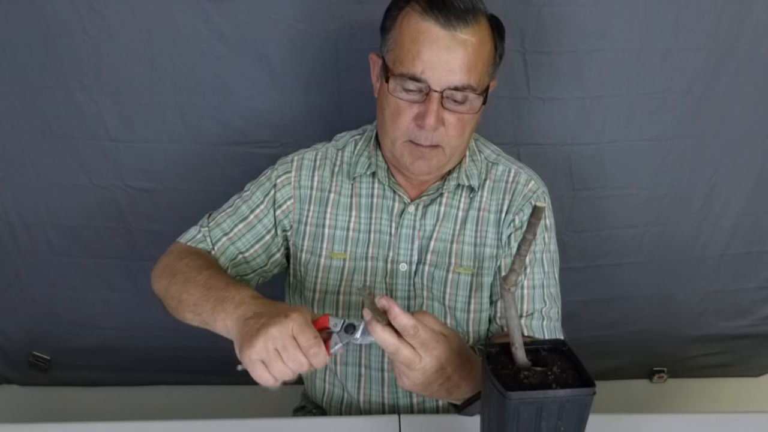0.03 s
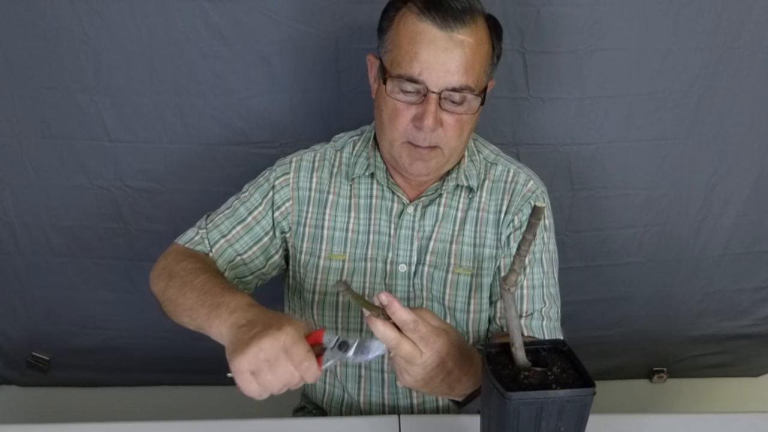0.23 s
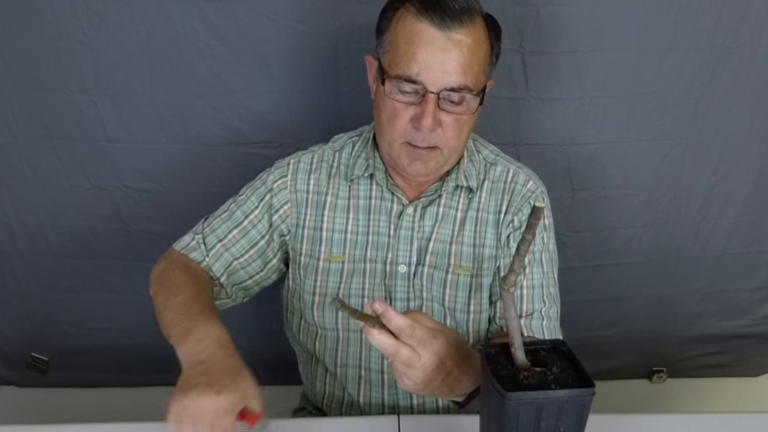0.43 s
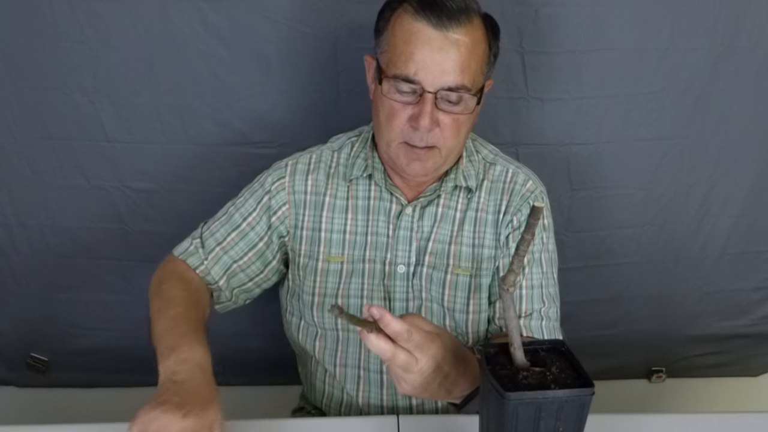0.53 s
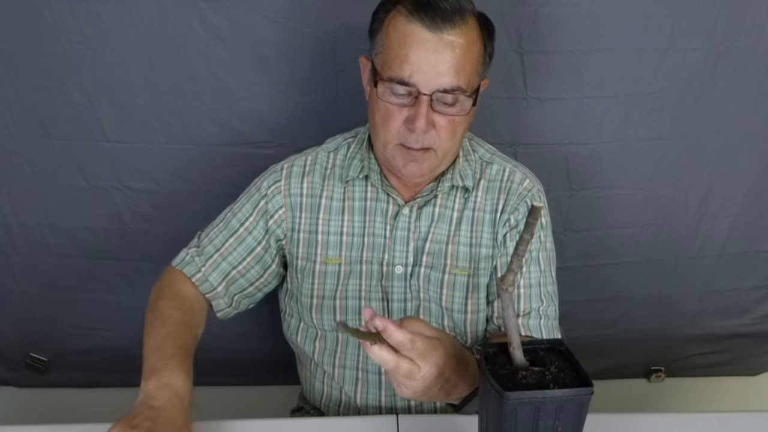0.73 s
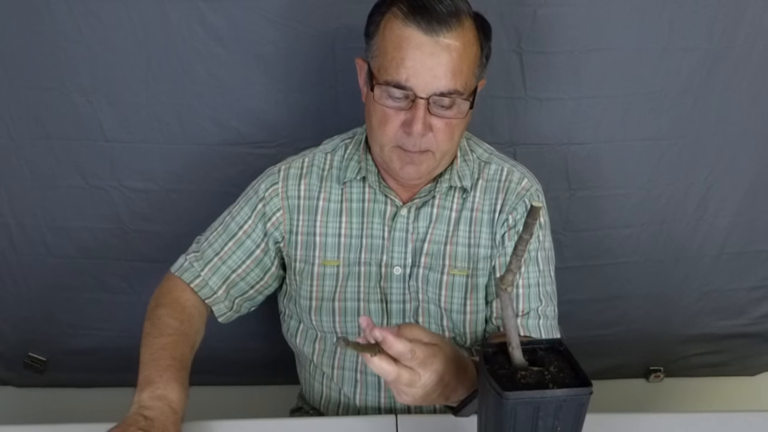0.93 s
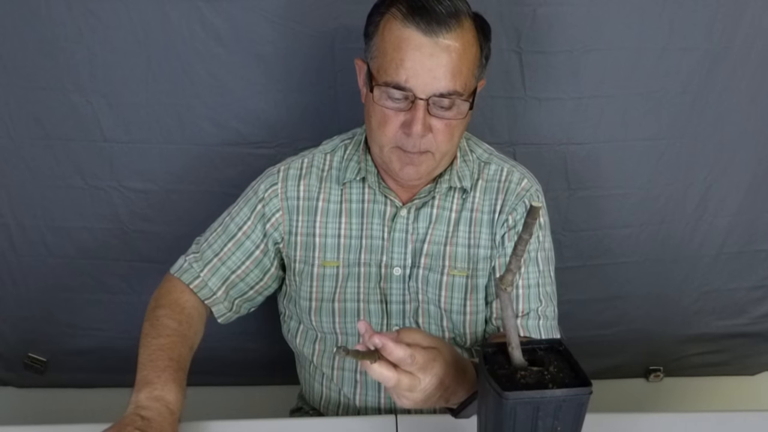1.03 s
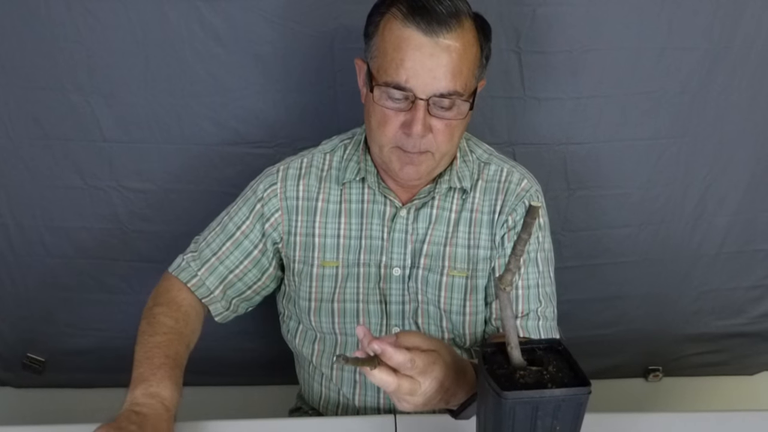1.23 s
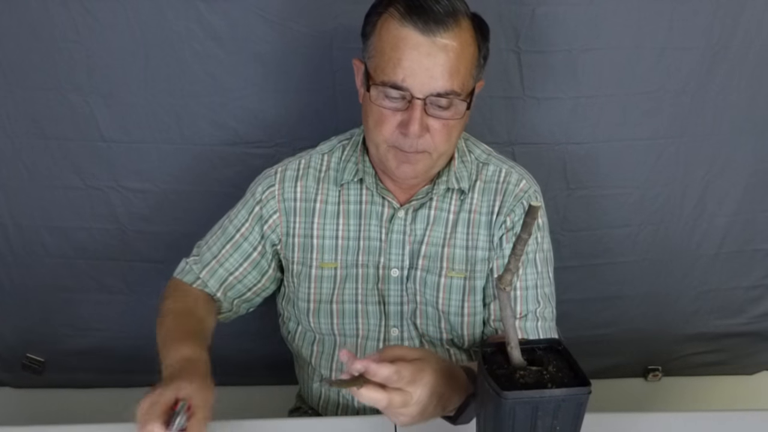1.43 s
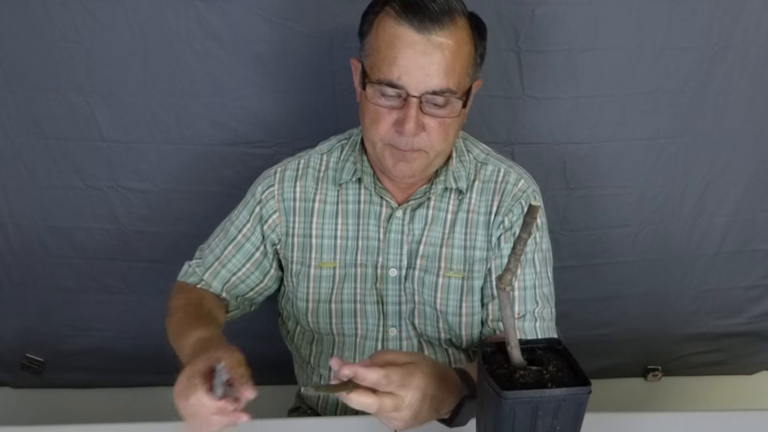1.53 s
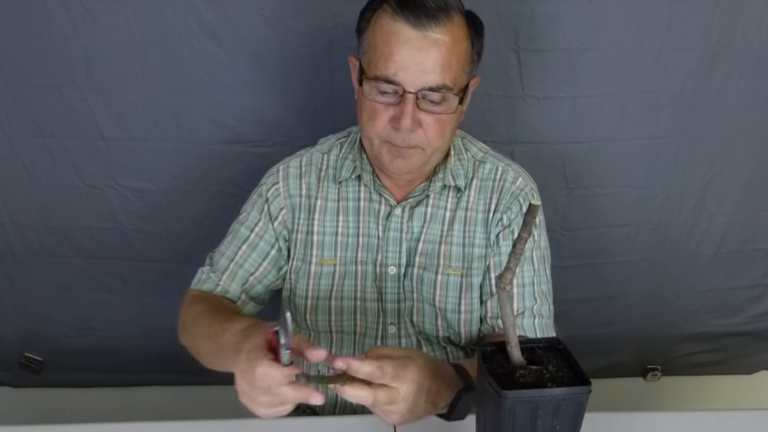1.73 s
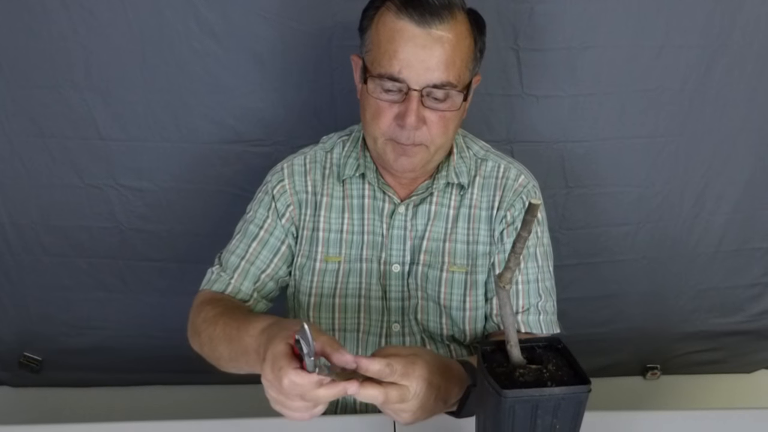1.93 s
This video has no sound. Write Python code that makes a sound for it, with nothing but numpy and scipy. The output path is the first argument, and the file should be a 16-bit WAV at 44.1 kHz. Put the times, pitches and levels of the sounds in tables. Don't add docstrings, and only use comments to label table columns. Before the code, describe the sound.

Hand pruning shears tick, crackle through a woody stem and snap shut with a brief steel ring, then are set down and dragged off a hollow plastic table, in a bare echoing room with faint ventilation hum.

```python
import sys
import numpy as np
from scipy import signal
from scipy.fft import rfft, irfft
from scipy.io import wavfile

SR = 44100
rng = np.random.default_rng(int(sys.argv[2]) if len(sys.argv) > 2 else 0)


def materialize(psi):
    bounded = np.clip(np.atleast_2d(psi).T, -1, 1)
    quanta = np.round(bounded * 32767).astype(np.int16)
    wavfile.write(sys.argv[1], SR, quanta)


def volts_from_decibels(level):
    exponent = np.asarray(level, float) / 20
    return 10 ** exponent


N = 88200
TIME_S = np.arange(N) / SR


def rms_one(x):
    return x / np.sqrt(np.mean(x ** 2) + 1e-20)


def at_hz(points, hz):
    table_hz, value = np.transpose(points)
    return np.interp(np.log(hz), np.log(table_hz), value)


def filtered(x, order, hz, kind):
    return signal.sosfilt(signal.butter(order, hz, kind, fs=SR, output="sos"), x)


def ring(x, modes, tilt_db_per_octave=0):
    out = 0
    for k, (hz, db, t60_s) in enumerate(modes):
        radius = volts_from_decibels(-60 / (t60_s * SR))
        angle = 2 * np.pi * hz / SR
        gain = volts_from_decibels(db + tilt_db_per_octave * np.log2(hz / 4000)) * (-1) ** k
        poles = [1, -2 * radius * np.cos(angle), radius * radius]
        out = out + gain * signal.lfilter([0, np.sin(angle)], poles, x + 1e-18)
    return out


def banded(likeness, gain_of_band):
    out = 0
    edges_hz = 24 * 2 ** (np.arange(29) / 3)
    white = rng.standard_normal((2, 2, N))
    for k, (low, high) in enumerate(zip(edges_hz, edges_hz[1:])):
        mid, side = filtered(white[k % 2], 2, [low, high], "band")
        hz = np.sqrt(low * high)
        alike = np.clip(at_hz(likeness, hz), 0, .999)
        stereo = np.sqrt(1 + alike) * mid + np.sqrt(1 - alike) * side * [[1], [-1]]
        out = out + gain_of_band(hz) * stereo
    return out


def grains(per_s, spread_db):
    size = volts_from_decibels(spread_db * np.minimum(rng.exponential(1, N), 4)) * rng.choice([-1, 1], N)
    return rms_one(size * (rng.random(N) < per_s / SR))


def swells(rows):
    out = 0
    for start_s, length_s, db in rows:
        u = np.clip((TIME_S - start_s) / length_s, 0, 9)
        out = out + volts_from_decibels(db) * np.sqrt(u) * np.exp(-u * u)
    return out


def contacts(rows, modes):
    crack_db = -13.5
    out = np.zeros(N)
    t = np.arange(int(.2 * SR)) / SR
    dead_modes = [(hz, db, .0015) for hz, db, _ in modes]
    for start_s, level_db, rise_s, tilt, crackle_s in rows:
        tones = 0
        for hz, db, t60_s in modes:
            decay = volts_from_decibels(db + tilt * np.log2(hz / 4000) - 60 * t / t60_s)
            tones = tones + decay * np.sin(2 * np.pi * (hz * t + rng.random()))
        burst = rng.standard_normal(len(t)) * np.exp(-t / crackle_s)
        crackle = ring(burst, dead_modes, tilt)
        swell = (1 - np.exp(-t / rise_s)) ** 2 * np.exp(rise_s * 900)
        i = int(start_s * SR)
        out[i:i + len(t)] += volts_from_decibels(level_db) * (tones + volts_from_decibels(crack_db) * crackle) * swell
    return out


# (frequency [Hz], level [dB per Hz])
HUM_SPECTRUM = [(15, -62), (25, -54), (114, -18.5), (149, -16), (309, -6.5), (695, -16.5), (887, -16),
                (11900, -31.5), (16000, -51.5)]
# (frequency [Hz], left-right likeness [0..1, below 0 counts as 0])
HUM_LIKENESS = [(60, -0.15), (240, 0.76), (950, -0.65), (3770, 0.16), (15000, 0.36)]


def ventilation():
    return volts_from_decibels(-56.5) * rms_one(banded(HUM_LIKENESS, lambda hz: volts_from_decibels(at_hz(HUM_SPECTRUM, hz))))


# (frequency [Hz], level [dB], t60 [s])
MOTOR_MODES = [(120.5, 2.5, 0.11), (197.6, -2.5, 0.51)]


def fan_motor():
    return volts_from_decibels(-67) * rms_one(ring(rng.standard_normal(N), MOTOR_MODES))


# (time [s], level [dB], rise [s], tilt [dB/octave], crackle [s])
BITE = [
    (.0790, -36.5, 0.000093, -0.26, 0.017),
]
# (frequency [Hz], level [dB], t60 [s])
BITE_MODES = [(1220, -6.5, 0.013), (1920, -3, 0.015), (4540, -1.5, 0.013), (6960, -7, 0.0052),
              (8900, -7.5, 0.0046), (11740, -4, 0.0017), (15300, -6, .003)]


def blade_bite():
    return contacts(BITE, BITE_MODES)


def shears_at_microphone(shears):
    pan_db, shadow_db, shadow_hz = 2.6, 4, 10000
    sos = signal.butter(2, shadow_hz, "high", fs=SR, output="sos")
    shade = volts_from_decibels(shadow_db) * signal.sosfiltfilt(sos, shears) * [[-1], [1]]
    return shears * volts_from_decibels([[pan_db], [-pan_db]]) + shade


# (frequency [Hz], t60 [s])
ROOM_T60 = [(150, 0.66), (500, 0.76), (1300, 0.63), (2300, 0.7), (3500, 0.68), (5200, 0.6469), (8000, 0.52),
            (13000, 0.1168)]
# (frequency [Hz], level [dB])
ROOM_LEVEL = [(150, -47.5), (500, -34), (1200, -40.5), (2400, -33.5), (3500, -35), (5200, -38), (8000, -35),
              (13000, -30)]
# (frequency [Hz], left-right likeness [0..1])
ROOM_LIKENESS = [(60, 0.38), (240, 1), (950, 0.65), (3770, 0.85), (15000, 0.49)]
# (delay [s], level [dB], pan [dB])
ECHOES = [
    (.0064, -3, -1.4),
    (.0035, -24.5, -24),
    (0.016, -4, 3.3),
]


def room(x):
    onset_s, smear_s = 0.018, 0.0015

    def decay(hz):
        return volts_from_decibels(at_hz(ROOM_LEVEL, hz) - 60 * TIME_S / at_hz(ROOM_T60, hz))

    response = banded(ROOM_LIKENESS, decay) * (1 - np.exp(-(TIME_S / onset_s) ** 2))
    for delay_s, db, pan_db in ECHOES:
        scatter = rng.standard_normal(N) * np.exp(-np.abs(TIME_S - delay_s) / smear_s * 2)
        gain = volts_from_decibels(db + np.array([[pan_db], [-pan_db]]) / 2)
        response += gain * scatter / np.sqrt(np.sum(scatter ** 2))
    return signal.fftconvolve(x[None], response, axes=1)[:, :N]


def fibre_crunch():
    start_s, end_s, end_db, rise_db = .218, .2475, -29, 19
    u = (TIME_S - start_s) / (end_s - start_s)
    swell = volts_from_decibels(end_db - rise_db * (1 - np.clip(u, 0, 1))) * (u > 0) * (u < 1)
    crackle = grains(3700, spread_db=-8.0) * swell
    return filtered(crackle, 2, [1500, 11500], "band") + volts_from_decibels(-30) * ring(crackle, BLADE_MODES)


# (time [s], level [dB], rise [s], tilt [dB/octave], crackle [s])
SNAPS = [
    (.2472, -16.5, 0.00043, 3, 0.0052),
    (.2488, -19, .0004, -4.5, 0.0019),
    (.2538, -4, 0.00057, 0.5, 0.0024),
]
# (frequency [Hz], level [dB], t60 [s])
BLADE_MODES = [(250, -39, 0.066), (400, -32, 0.017), (844, -32, 0.024), (2085, 1, 0.0057),
               (3330, -8, 0.0082), (3620, -18, 0.0039), (5105, 2, 0.0067), (6370, -13, 0.0037),
               (6880, -14, 0.012), (10300, -6.5, 0.0062), (12600, -14, 0.0017)]


def blade_snap():
    return contacts(SNAPS, BLADE_MODES)


# (start [s], length [s], level [dB])
RUSTLES = [
    (.81, 0.017, -60.5),
    (.99, 0.061, -62),
    (1.26, 0.026, -64),
    (1.42, 0.045, -55.5),
]


def rustles():
    airy = filtered(grains(8000, spread_db=6.5), 2, [5000, 12000], "band")
    return rms_one(airy) * swells(RUSTLES)


# (frequency [Hz], level [dB], t60 [s])
TABLE_MODES = [(132.4, -10, 0.15), (210, -2.5, 0.13), (246.7, -3, 0.16), (310, -2.5, 0.082),
               (345, -5.5, 0.2), (379, -4, 0.05), (474.7, -6.5, 0.089), (558, -11, 0.099),
               (670, -10, 0.072), (834, -12.5, 0.065), (1018, -13.5, .05), (1312, -10, 0.016)]
# (time [s], level [dB], softness [Hz], best excited mode [Hz])
KNOCKS = [
    (.9765, -28, 1120, 350),
    (.992, -34.5, 990, 420),
    (1.005, -40, 700, 310),
    (1.188, -52, 701, 380),
    (1.359, -36.5, 1000, 400),
]


def table_knocks():
    spot_db_per_octave = 9
    out = np.zeros(N)
    for start_s, level_db, soft_hz, spot_hz in KNOCKS:
        u = np.clip(TIME_S - start_s, 0, .05) * 2 * np.pi * soft_hz
        push = u * np.exp(-u)
        modes = [(hz, db - spot_db_per_octave * abs(np.log2(hz / spot_hz)), 0.78 * t60_s)
                 for hz, db, t60_s in TABLE_MODES]
        out += volts_from_decibels(level_db) * ring(push / push.sum(), modes)
    return out


# (start [s], length [s], level [dB])
GRAZES = [
    (0.978, 0.017, -52),
    (.99, 0.14, -59),
    (1.35, 0.033, -37.5),
    (1.39, 0.11, -50.5),
]
# (frequency [Hz], level [dB per Hz])
GRAZE_SPECTRUM = [(590, -31), (1000, -33), (1630, -3), (1770, -7), (2320, 0), (3670, -7), (12000, -34),
                  (15600, -65.5), (22000, -120)]


def steel_grazes():
    hz = np.fft.rfftfreq(N, 1 / SR) + 1
    colour = volts_from_decibels(at_hz(GRAZE_SPECTRUM, hz)) * (hz > 900)
    grit = irfft(rfft(grains(3300, spread_db=0.0)) * colour, N)
    return rms_one(grit) * swells(GRAZES)


# (time [s], level [dB])
SHIFT = [
    (1.0, -37),
    (1.14, -56.5),
    (1.178, -46),
    (1.196, -44),
    (1.218, -48.5),
    (1.314, -46),
    (1.33, -67),
]
# (time [s], level [dB])
DRAG = [
    (1.33, -51.5),
    (1.356, -31),
    (1.378, -30.5),
    (1.44, -38.5),
    (1.486, -55),
    (1.572, -75),
    (1.62, -60.5),
]


def table_rub():
    damped = [(hz, db, .5 * t60_s) for hz, db, t60_s in TABLE_MODES]
    rub = rms_one(ring(grains(1200, spread_db=3.0), damped))
    press = 0
    for curve, level_db in ((SHIFT, -3.5), (DRAG, 1.5)):
        curve_s, curve_db = np.transpose(curve)
        press = press + volts_from_decibels(level_db + np.interp(TIME_S, curve_s, curve_db, left=-120, right=-120))
    return rub * press


# (time [s], level [dB], rise [s], tilt [dB/octave], crackle [s])
SPRING = [
    (1.5372, -28.5, 0.000074, 0.018, 0.0027),
]
# (frequency [Hz], level [dB], t60 [s])
SPRING_MODES = [(1234, -15.5, 0.038), (1960, -2, 0.012), (2440, -6, 0.0083), (3030, -3.5, 0.0028),
                (4140, 2.5, .003), (4750, -5.5, 0.0043), (6400, -10, 0.0026), (9900, -22, 0.0052)]


def spring_click():
    return contacts(SPRING, SPRING_MODES)


def scene():
    shears = blade_snap() + blade_bite() + spring_click() + fibre_crunch()
    table = table_knocks() + table_rub() + steel_grazes() + rustles()
    wet = room(shears + volts_from_decibels(-3.5) * table)
    events = shears_at_microphone(shears) + table + wet
    return filtered(events, 4, 135, "high") + ventilation() + fan_motor()


def top_cut(x):
    return signal.sosfilt(signal.butter(12, 16450, fs=SR, output="sos"), x)


def record(dry):
    mix = filtered(dry, 8, 15000, "low")
    return top_cut(mix)


dry = scene()
out = record(dry)
materialize(out)
```